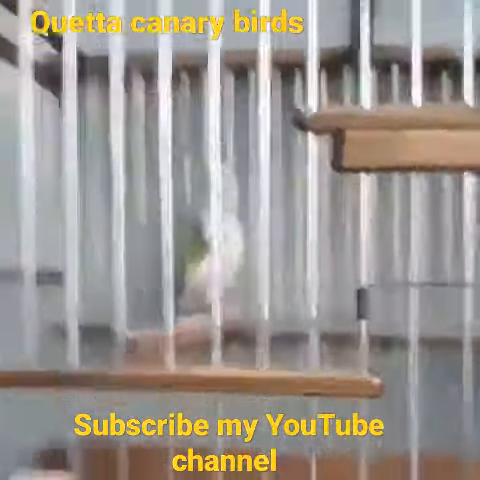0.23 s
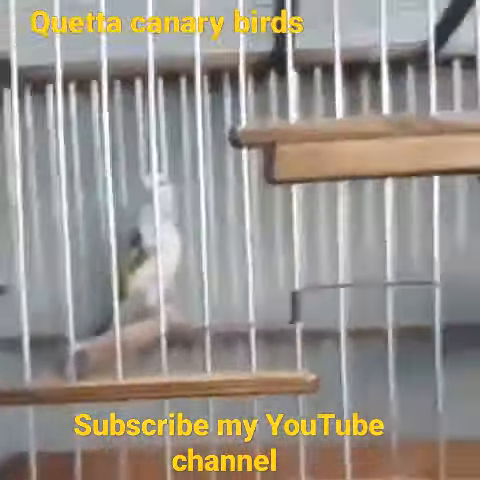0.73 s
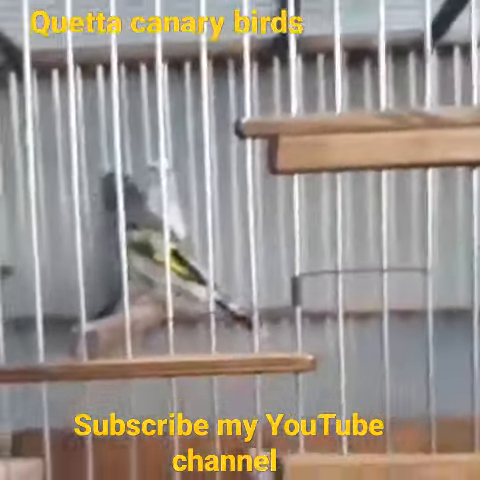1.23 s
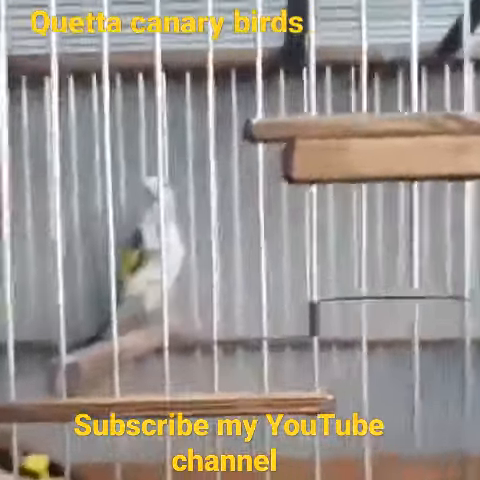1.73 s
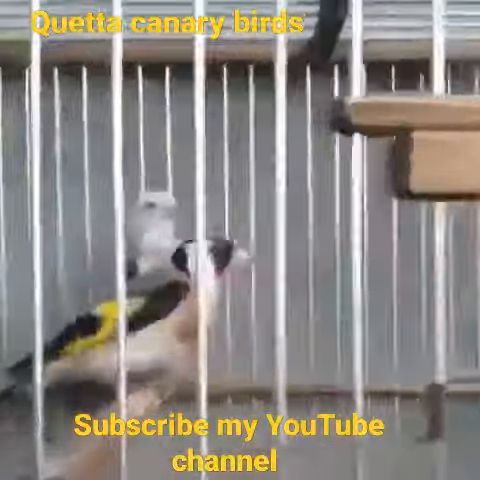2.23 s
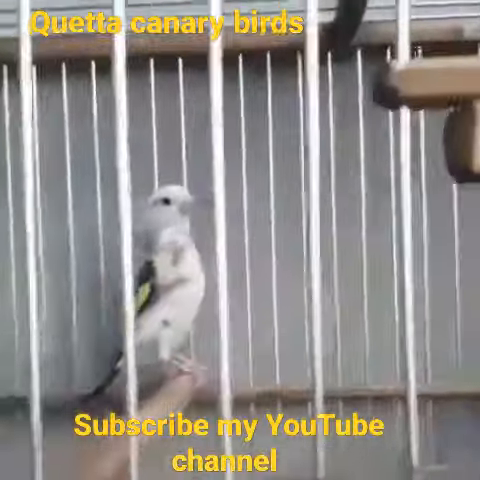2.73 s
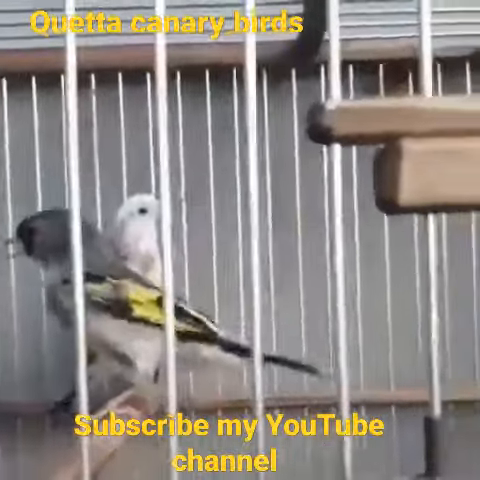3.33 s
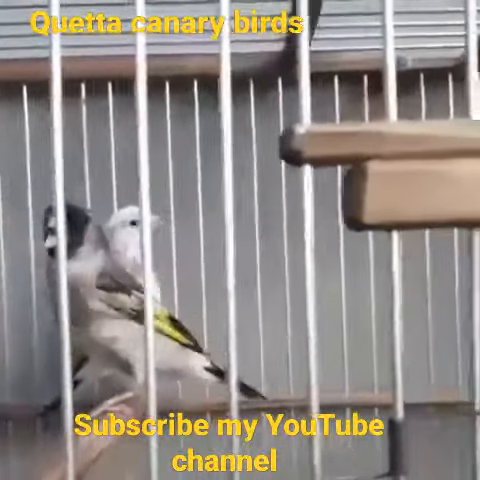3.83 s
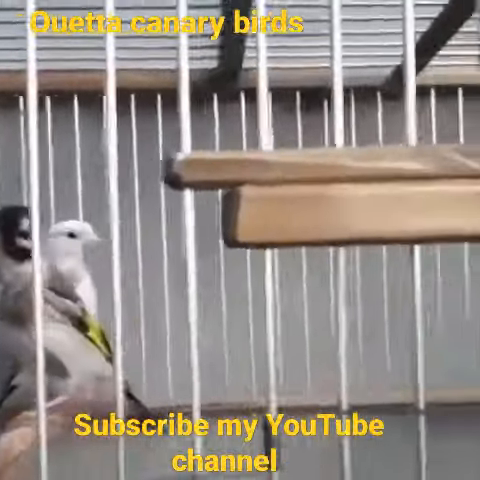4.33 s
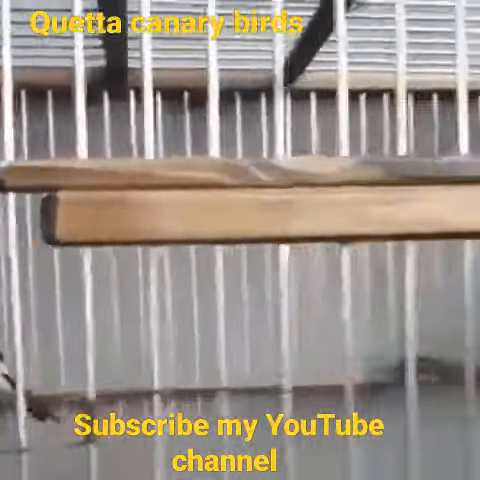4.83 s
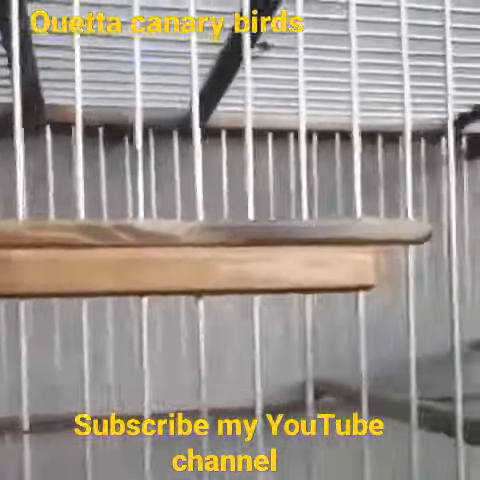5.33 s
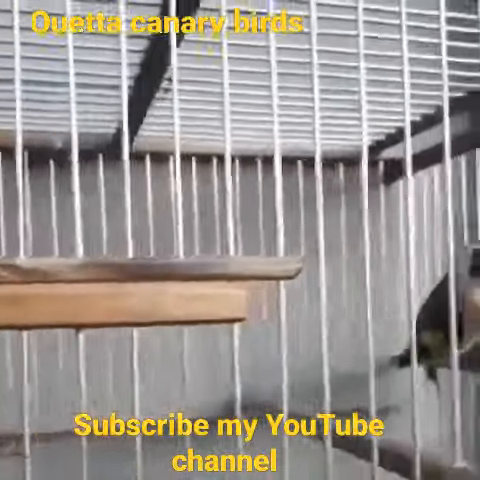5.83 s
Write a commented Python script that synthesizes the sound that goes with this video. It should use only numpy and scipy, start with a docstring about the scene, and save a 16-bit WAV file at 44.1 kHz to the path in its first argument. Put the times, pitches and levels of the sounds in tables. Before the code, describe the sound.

A close, dry-sounding wire cage in an echoing room, with soft low rumble and dull room tone. At 0.2 and 0.3 s a finch gives two brief, falling chirps, very high and two-toned. Wings flutter and brush wires from 0.1 to 1.2 s, with light ticks. A brighter chirp comes at 1.0 s as feet rattle wires and tap a wooden perch; scattered knocks continue to 2.0. From 2.1 to 2.7 s the clatter is busiest, with a hard quill snap at 2.2, wing puffs, tray thumps and a chirp at 2.4. More flutter and knocks surround the two loudest, piercing chirps at 3.15 and 3.35 s. After 3.6 s only sparse, softer taps and faint brushing remain. Distant birds slide and twitter in blurred echo throughout, chattering faintly around 5.0 and 5.4-5.9 s. A thin steady mid-high whistle fades in and out from 3.8 s, clearest near 5.6, until 6 s.

```python
"""A finch close by gives two short falling chirps over a soft rumble, then a few more, in a wire cage indoors.
Each chirp is two gliding tones at once, one for each side of the voice box.
Feet and wings strike wires, perches and tray as noise bursts through resonances; quills snap, wings brush wires.
Feathers rustle and fan the air as swelling coloured noise, and a thin steady whistle comes and goes.
Far birds are sliding tones and a blurred twitter, heard mostly as the echo of a large room."""
import sys
import numpy as np
from scipy import signal
from scipy.fft import rfft, irfft
from scipy.io import wavfile
from scipy.ndimage import uniform_filter1d

SR = 44100
rng = np.random.default_rng(int(sys.argv[2]) if len(sys.argv) > 2 else 0)


def wrap_up_sound(samples):
    """Save the sound to the file named by the first command line argument, as 16-bit audio."""
    columns = np.atleast_2d(samples).T
    # keep every value between -1 and 1, then stretch to whole-number steps
    tamed = np.clip(columns, -1, 1)
    steps = np.round(tamed * 32767).astype(np.int16)
    wavfile.write(sys.argv[1], SR, steps)


def voltage_ratio(decibels):
    """Convert decibels (scalar or array-like) to amplitude ratios, 20 dB per decade."""
    exponent = np.asarray(decibels, float) / 20
    return 10 ** exponent


N = 268524   # samples in the scene


def rms_one(x):
    """Scale to rms 1."""
    return x / np.sqrt(np.mean(x ** 2) + 1e-20)


def band(x, low_hz, high_hz):
    """Butterworth band-pass."""
    high_hz = min(high_hz, .45 * SR)
    return signal.sosfilt(signal.butter(2, [low_hz, high_hz], "band", fs=SR, output="sos"), x)


def drift(rate):
    """Random wander: 2 * rate points a second, of spread 1, joined by straight lines."""
    points = int(N / SR * rate * 2) + 2
    return np.interp(np.linspace(0, points - 1, N), np.arange(points), rng.standard_normal(points))


def coloured(spectrum, patchy_db):
    """Noise with a given spectrum whose level flickers; rms 1."""
    hz, level_db = np.transpose(spectrum)
    bins = np.arange(N // 2 + 1) * SR / N + 1
    gain = voltage_ratio(np.interp(np.log(bins), np.log(hz), level_db))
    shaped = irfft(rfft(rng.standard_normal(N)) * gain, N)
    return rms_one(shaped * voltage_ratio(patchy_db * drift(17)))


def resonate(x, modes):
    """Parallel resonances; white noise of rms 1 comes out at about rms 1."""
    out, power = 0, 0
    for k, (hz, width_hz, level_db) in enumerate(modes):
        r = np.exp(-np.pi * width_hz / SR)   # pole radius: a wider mode dies sooner
        top, poles = (1 - r * r) / 2, [1, -2 * r * np.cos(2 * np.pi * hz / SR), r * r]
        ring = signal.lfilter([top, 0, -top], poles, x + 1e-18)
        out = out + (-1) ** k * voltage_ratio(level_db) * ring
        power += voltage_ratio(level_db) ** 2 * np.pi * width_hz / SR
    return out / np.sqrt(power)


def room(x, t60, gap_s, bend, lumps_db):
    """Dense, lumpy echoes after a short gap that hold at first and then die faster; energy 1."""
    t = np.arange(int(t60 * SR)) / SR
    lumpy = (rng.standard_normal(N) * voltage_ratio(lumps_db * drift(45)))[:len(t)]
    echoes = lumpy * voltage_ratio(-60 * (t / t60) ** bend) * (t > gap_s)
    return signal.fftconvolve(x, echoes / np.sqrt(np.sum(echoes ** 2)))[:N]


def sliding_tone(s, length, start_hz, end_hz, level_db, crest, glide_s):
    """A complex tone that slides toward its end pitch under one swell; returns its place and samples."""
    t = np.arange(int(length * SR)) / SR
    crest = np.clip(crest, .1, .9)
    warped = np.interp(t / length, [0, crest, 1], [0, .5, 1])
    swell = np.sin(np.pi * warped) ** 0.88
    hz = end_hz + (start_hz - end_hz) * np.exp(-t / glide_s)
    tone = voltage_ratio(level_db) * np.sqrt(2) * swell * np.exp(2j * np.pi * np.cumsum(hz) / SR)
    first = int(s * SR)
    return slice(first, first + len(t)), tone


def swells(rows, rise_s, fall_s, floor_db):
    """Gain of bouts that rise, hold and fall at steady rates, in seconds per 20 dB, over a floor."""
    t, out = np.arange(N) / SR, np.full(N, voltage_ratio(floor_db))
    for s, length, level_db in rows:
        rise_db = 20 * np.clip(s - t, 0, None) / rise_s
        fall_db = 20 * np.clip(t - s - length, 0, None) / fall_s
        out += voltage_ratio(level_db - rise_db - fall_db)
    return out


def strokes(times, levels_db, fall_s):
    """Contact envelopes: a quick rise and an exponential decay."""
    t, starts, rise_s = np.arange(int(.15 * SR)) / SR, np.zeros(N), .0029
    np.add.at(starts, (times * SR).astype(int), voltage_ratio(levels_db))
    return np.abs(signal.fftconvolve(starts, (1 - np.exp(-t / rise_s)) * np.exp(-t / fall_s))[:N])


# Spectrum of the room tone. Each row: frequency in Hz, relative level in dB per Hz.
ROOM_TONE_SPECTRUM = [(88, -31.5), (150, -3.5), (424, 2), (457, 1.5), (643, -1), (748, -2.5), (1370, -4.5),
                      (1530, -8), (1750, -12.5), (4950, -46.5), (5980, -53.5), (12000, -55), (13700, -50)]


def room_tone():
    """Steady noise, mostly below 2 kHz, whose level sways gently."""
    level_db, sway_db = -57, -0.85
    return voltage_ratio(level_db + sway_db * drift(1.4)) * coloured(ROOM_TONE_SPECTRUM, patchy_db=-1.0)


# A wing fans air on the microphone. Each row: start in seconds, length in seconds, level in dB.
WING_GUSTS = [(.34, 0.011, -56.5), (.56, .02, -65), (1.7, .02, -59.5), (2.15, .02, -59),
              (2.33, 0.056, -48.5), (3.0, .02, -59), (3.13, 0.035, -51.5), (3.39, .12, -57.5),
              (4.02, 0.018, -57.5)]


def draught():
    """Low noise: puffs of air from a wing over a soft rumble."""
    rise_s, fall_s, rumble_db = 0.078, 0.1, -60   # s per 20 dB; the rumble between gusts
    air = swells(WING_GUSTS, rise_s, fall_s, rumble_db) * voltage_ratio(1.5 * drift(6))
    return air * rms_one(band(band(rng.standard_normal(N), 51.05, 170), 44, 310))


# A thin whistle comes and goes. Each row: start in seconds, length in seconds, peak level in dB.
WHISTLE_BOUTS = [(3.83, .07, -69.5), (3.98, .17, -69), (4.24, 0.47, -66), (4.85, 0.18, -66),
                 (5.07, 0.25, -62), (5.53, 0.19, -59.5), (5.82, .23, -67.5)]


def thin_whistle():
    """A sine of steady pitch that fades in and out."""
    hz, edge_s = 1510, .06   # s per 20 dB
    return swells(WHISTLE_BOUTS, edge_s, edge_s, -np.inf) * np.sin(2 * np.pi * hz * np.arange(N) / SR)


# Far birds, one of them a low coo. Each row: start in seconds, length in seconds, start pitch in Hz,
# end pitch in Hz, level in dB ahead of the room.
DISTANT_CALLS = [(.704, 0.021, 1544, 1250, -48), (0.89, 0.03, 2220, 3230, -53),
                 (1.774, 0.046, 2800, 2834, -55), (2.313, 0.03, 4010, 2380, -43),
                 (2.405, 0.029, 3770, 2510, -42), (2.812, 0.049, 2616, 3450, -58.5),
                 (3.74, 0.075, 2510, 3000, -56.5), (3.861, 0.1, 2905, 3115, -54),
                 (4.054, 0.074, 3050, 3126, -57.5), (3.6, 0.45, 142.1, 142.3, -62),
                 (4.45, 0.15, 2090, 2170, -63.5), (4.551, 0.022, 4590, 6700, -47.5),
                 (5.367, 0.12, 1980, 2153, -66.5), (5.751, 0.112, 1976, 1780, -64)]
# One far bird chatters in steep falling slurs. Each row: start in seconds, start pitch in Hz,
# level in dB ahead of the room.
CHATTER_SLURS = [(4.961, 3800, -56), (5.056, 4290, -51), (5.427, 3300, -66.5), (5.5, 3650, -50.5),
                 (5.581, 4200, -46.5), (5.668, 4545, -42.5), (5.731, 4200, -51), (5.775, 4310, -47),
                 (5.85, 3880, -60)]
# Blurred twitter of birds farther off, phrase by phrase. Each row: start in seconds, length in seconds,
# level in dB ahead of the room.
TWITTER_PHRASES = [(.16, .08, -69), (.5, 0.16, -58.5), (.75, 0.27, -68), (1.45, 0.34, -70), (1.9, .2, -63),
                   (2.34, 0.033, -53), (3.16, 0.026, -57.5), (3.45, 0.093, -72.5), (4.27, 0.057, -59.5),
                   (4.4, 0.087, -74.5), (4.6, 0.39, -67.5), (5.72, 0.17, -75), (6.0, .04, -78.5)]


def far_birds():
    """Hoarse slurs and whistles over a blur of twitter, heard mostly as echo."""
    chatter_s, chatter_end_hz = 0.02, 1900
    warble_share = .04   # pitch wobble as a share of the pitch
    twitter_hz, spread_hz = 4110, 260
    calls, wobble = np.zeros(N), np.cumsum(drift(300)) / SR
    chatter = [(s, chatter_s, start_hz, chatter_end_hz, level_db) for s, start_hz, level_db in CHATTER_SLURS]
    for s, length, start_hz, end_hz, level_db in DISTANT_CALLS + chatter:
        warble_hz = warble_share * .5 * (start_hz + end_hz)
        place, tone = sliding_tone(s, length, start_hz, end_hz, level_db, .4, .8 * length)
        calls[place] += (tone * np.exp(2j * np.pi * warble_hz * wobble[place])).real
    hoarse = calls * voltage_ratio(4.0 * drift(600))
    twitter = 0
    for _ in range(4):   # several singers, each with quick slides and broken phrases
        pitch = twitter_hz + spread_hz * (drift(60) + .6 * drift(4))
        twitter = twitter + np.sin(2 * np.pi * np.cumsum(pitch) / SR) * voltage_ratio(5.0 * drift(21))
    phrases = swells(TWITTER_PHRASES, rise_s=.1, fall_s=0.099, floor_db=-87.5)
    birds = hoarse + phrases * rms_one(twitter)
    return voltage_ratio(-5) * birds + room(birds, t60=0.36, gap_s=0.0063, bend=1.4, lumps_db=4.0)


# Bouts of wing beating. Each row: start in seconds, length in seconds, level in dB.
WING_BOUTS = [(.12, 0.22, -60.5), (.36, 0.34, -52), (.76, 0.43, -57), (1.72, 0.34, -64.5),
              (2.27, 0.28, -50), (2.66, 0.071, -53), (3.0, 0.33, -58), (3.52, 0.096, -67),
              (3.87, 0.14, -68.5), (4.82, 0.26, -76.5), (5.58, 0.26, -68)]
# Spectrum of rustling feathers. Each row: frequency in Hz, relative level in dB per Hz.
FEATHER_SPECTRUM = [(180, -32.5), (300, 0), (461, -11.5), (499, -5), (1320, 1), (1840, -2.5), (2930, -5.5),
                    (4220, -4.5), (5360, -9.5), (8920, -8), (10500, -12), (12700, -18), (13500, -30.5)]


def feathers():
    """Flickering coloured noise that swells with each bout of wing beating."""
    rise_s, fall_s, shuffle_db = 0.11, 0.049, -73.5   # s per 20 dB; the shuffle between bouts
    return swells(WING_BOUTS, rise_s, fall_s, shuffle_db) * coloured(FEATHER_SPECTRUM, patchy_db=4.5)


# A wing drags over the wires. Each row: start in seconds, length in seconds, level in dB,
# lowest frequency in Hz, highest frequency in Hz.
WING_BRUSHES = [(0.233, 0.058, -46, 960, 7560), (0.458, 0.15, -50, 1800, 6000),
                (0.601, 0.13, -46, 1400, 5430), (3.523, 0.14, -49.5, 812, 1500),
                (4.232, 0.13, -55.5, 1900, 7300), (4.433, 0.16, -57, 797, 2190),
                (4.818, 0.36, -76, 4500, 9230)]


def brushes():
    """Grainy noise that starts quickly and fades over the stroke."""
    out, t = np.zeros(N), np.arange(N) / SR
    grains = rms_one(rng.standard_normal(N) * voltage_ratio(2.7 * drift(150)))
    for s, length, level_db, low_hz, high_hz in WING_BRUSHES:
        stroke = np.interp(t, [s, s + .012, s + .8 * length, s + length], [0, 1, .8, 0])
        out += voltage_ratio(level_db) * stroke * rms_one(band(grains, low_hz, high_hz))
    return out


# A quill snaps against a wire. Each row: start in seconds, level in dB (9 dB above the rms at the crest).
QUILL_SNAPS = [(0.339, -23), (1.2493, -34), (1.4315, -37), (1.6807, -33), (1.8885, -35), (2.1348, -21.5),
               (2.2186, -15.5), (2.2442, -23), (2.4853, -23), (2.6523, -33), (2.6778, -42), (3.0074, -21.5),
               (3.079, -36.5), (3.229, -30), (3.6136, -30)]


def snaps():
    """Each snap is one broad crack of noise, about two milliseconds long."""
    t, level = np.arange(N) / SR, np.zeros(N)
    for s, level_db in QUILL_SNAPS:
        level += voltage_ratio(level_db - 9.0) * np.exp(-.5 * ((t - s - .0015) / 0.0009) ** 2)
    return level * rms_one(band(rng.standard_normal(N), 760, 9500))


# Feet and wing tips on the cage. Each row: start in seconds, then relative levels in dB of wire,
# feather swish and perch.
CAGE_KNOCKS = [(0.334, -34, -42, -42), (0.5516, -38, -53, -57), (0.62, -43, -57, -48),
               (0.72, -48, -60, -47), (1.005, -33, -49, -41.5), (1.0316, -28.5, -41.5, -38.5),
               (1.125, -29, -46, -32.5), (1.1934, -41, -56, -44.5), (1.245, -49, -53.5, -47.5),
               (1.296, -44.5, -58.5, -50.5), (1.4278, -36.5, -58, -40), (1.464, -45, -59, -54),
               (1.507, -32, -53.5, -35.5), (1.6807, -30, -49, -28.5), (1.726, -41, -66, -43.5),
               (1.8557, -41.5, -60, -44), (1.882, -38.5, -63, -70), (1.958, -39.5, -65, -59),
               (2.006, -38, -67, -66), (2.11, -30.5, -48.5, -51), (2.1296, -24.5, -39, -43),
               (2.154, -25, -40.5, -39.5), (2.171, -34.5, -42, -47.5), (2.2119, -16.5, -46, -50),
               (2.245, -28, -41, -43.5), (2.275, -53, -51, -54), (2.3216, -35, -46, -41.5),
               (2.354, -36, -47, -55), (2.4726, -25, -47, -32.5), (2.4852, -26.5, -64, -29.5),
               (2.54, -29, -44.5, -40), (2.592, -31, -42, -48), (2.649, -34, -46.5, -43),
               (2.674, -32, -50, -34.5), (2.7065, -43, -51, -41), (3.005, -32, -37, -38.5),
               (3.075, -35.5, -54.5, -45), (3.121, -33, -49.5, -45.5), (3.2254, -29, -55, -42.5),
               (3.523, -37, -47.5, -44.5), (3.61, -34, -42.5, -54.5), (3.862, -63, -71, -47),
               (4.124, -40, -64, -56), (4.247, -37.5, -75, -49), (4.4435, -61, -80, -43.5),
               (5.083, -46.5, -67, -70), (5.714, -53, -57.5, -54), (5.998, -50.5, -73, -50.5)]
# A foot thumps on the tray. Each row: start in seconds, relative level in dB.
TRAY_THUMPS = [(.3334, -42), (1.02, -44), (1.1244, -44), (1.508, -41), (1.69, -46.5), (2.145, -38.5),
               (2.211, -37), (2.3216, -42), (2.4841, -42.5), (2.5397, -41.5), (2.67, -44), (2.7076, -38),
               (3.0695, -42), (3.606, -40), (3.863, -45.5), (4.1257, -49)]
# What wires, wooden perches and tray ring with. Each row: frequency in Hz, width in Hz, relative level in dB.
WIRE_MODES = [(3000, 1500, 1.5), (3800, 430, 13.5), (4500, 500, 9), (6230, 330, 5.5), (7300, 309, -21.5)]
PERCH_MODES = [(780, 120, -3), (998, 86, 2.5), (1153, 70, 2.5), (1290, 48, 5), (1500, 160, 1.5),
               (2060, 120, 1), (2390, 150, -12)]
TRAY_MODES = [(269, 130, -3), (446, 160, 1.7)]


def knocks():
    """Each contact is a dying rattle of grains through resonances; wood and tray outlast the wires."""
    wire_s, swish_s, perch_s, tray_s = .0115, 0.00914, 0.016, 0.024   # decay time constants
    s, wire_db, swish_db, perch_db = np.transpose(CAGE_KNOCKS)
    thump_s, thump_db = np.transpose(TRAY_THUMPS)
    grains = rms_one(rng.standard_normal(N) * voltage_ratio(3.1 * drift(400)))
    wire = voltage_ratio(-4.5) * strokes(s, wire_db, wire_s) * grains
    swish = strokes(s, swish_db, swish_s) * grains
    perch = strokes(s, perch_db, perch_s) * grains
    tray = strokes(thump_s, thump_db, tray_s) * grains
    bright = voltage_ratio(13) * band(swish, 7300, 10000) + voltage_ratio(5) * band(swish, 11000, 12000)
    return resonate(wire, WIRE_MODES) + bright + resonate(perch, PERCH_MODES) + resonate(tray, TRAY_MODES)


# Near chirps, one table per side of the voice box. Each row: start in seconds, length in seconds,
# start pitch in Hz, end pitch in Hz, rms level in dB at the crest ahead of any echo notch.
LOWER_CHIRPS = [(0.168, 0.033, 6450, 5640, -37), (.286, 0.04, 6470, 5040, -34),
                (1.01, 0.028, 6700, 5650, -23), (2.413, 0.035, 6350, 5650, -28.5),
                (3.156, 0.027, 6480, 5578, -18), (3.335, 0.037, 6230, 5190, -17)]
UPPER_CHIRPS = [(.175, 0.023, 8080, 6690, -27), (.290, 0.029, 7530, 6250, -22.5),
                (1.015, 0.02, 8190, 6550, -15), (2.418, 0.025, 7760, 6670, -20),
                (3.16, 0.024, 8240, 6450, -11), (3.336, 0.041, 7900, 6250, -10.5)]
# Manner of each chirp. Each row: place of the crest from 0 to 1, overtones in dB, echo send in dB,
# stronger when the bird calls from farther back.
CHIRP_MANNERS = [(0.48, -8, -12), (.39, -11.5, -7), (0.7, -32.5, -19.5), (0.36, -17, -17.5),
                 (.72, -18, -24), (0.29, -22.5, -19.5)]
# A reflection off the cage wall briefly weakens or strengthens each tone. Each row: centre in seconds,
# upper tone change in dB, lower tone change in dB, width (standard deviation) in seconds.
ECHO_NOTCHES = [(.187, -15, 1.5, 0.003), (0.298, -14, 6.5, 0.003), (0.307, -8.5, 3, 0.0016),
                (2.434, -24, 4, 0.001), (3.35, -14.5, -3.5, .0017)]


def near_bird():
    """Two voices share one windpipe and add overtones, sum and difference tones; returns voice and echo send."""
    glide_s, lower_later = .012, 0.13   # pitch time constant; share of the note by which the lower crest lags
    low, high, t = np.zeros(N, complex), np.zeros(N, complex), np.arange(N) / SR
    overtones, echo = np.zeros(N), np.zeros(N)
    for lower, upper, (crest, overtone_db, echo_db) in zip(LOWER_CHIRPS, UPPER_CHIRPS, CHIRP_MANNERS):
        for voice, row, peak in ((low, lower, crest + lower_later), (high, upper, crest)):
            place, tone = sliding_tone(*row, peak, glide_s)
            voice[place], overtones[place], echo[place] = tone, voltage_ratio(overtone_db), voltage_ratio(echo_db)
    for s, upper_db, lower_db, width_s in ECHO_NOTCHES:
        notch = np.exp(-.5 * ((t - s) / width_s) ** 2)
        high, low = high * voltage_ratio(upper_db * notch), low * voltage_ratio(lower_db * notch)
    both = np.abs(low) + np.abs(high) + 1e-6
    # octave of the lower voice, and the sum of both pitches
    sums = overtones * (low * low + voltage_ratio(-2.0) * low * high) / both
    # twice one pitch less the other
    above, below = high * high * low.conj(), low * low * high.conj()
    sidebands = (voltage_ratio(-15.5) * above + voltage_ratio(-19.5) * below) / both ** 2
    bird = (low + high + sums + sidebands).real
    return bird, echo * bird


def scene():
    """Near sounds with their echoes, far birds, feathers, draught, room tone and whistle."""
    bird, send = near_bird()
    cage = knocks() + snaps() + brushes()
    near = bird + cage + room(send + voltage_ratio(-10.5) * cage, t60=0.29, gap_s=0.0085, bend=1.6, lumps_db=6.5)
    # the cage wall answers first
    near += voltage_ratio(-9) * room(bird, t60=.04, gap_s=0.00069, bend=1.2, lumps_db=-0.5)
    mono = near + far_birds() + feathers() + draught() + room_tone() + thin_whistle()
    return np.array([mono, mono])


def roll_off(x):
    """The treble ends steeply here."""
    return signal.sosfilt(signal.butter(12, 13880, fs=SR, output="sos"), x)


def record(dry):
    """A dip near 10.5 kHz, a cut top, and noise, mostly in quiet treble, opposite in the two channels."""
    dry = dry - .5 * band(dry, 9700, 11400)
    low_treble = band(band(dry[0], 4600, 7500), 3600, 9000)
    treble = band(band(dry[0], 6700, 16000), 8300, 17000)
    middle = band(band(dry[0], 600, 4000), 400, 5000)
    loudness = np.sqrt(uniform_filter1d(low_treble ** 2, size=1024) + 1e-18)
    # the treble's share shrinks as the low treble grows loud
    noise_source = voltage_ratio(-6) * low_treble / (1 + loudness / voltage_ratio(-53.5))
    noise_source = noise_source + voltage_ratio(-3) * treble / (1 + loudness / voltage_ratio(-28)) + voltage_ratio(-36.0) * middle
    side_noise = noise_source * drift(60)   # random gain turns it noise-like
    sides = dry + side_noise * [[1], [-1]]
    cut = signal.sosfilt(signal.cheby2(10, 30, 13500, fs=SR, output="sos"), sides)   # 30 dB down from 13.5 kHz
    return roll_off(cut)


dry = scene()
out = record(dry)
wrap_up_sound(out)
```